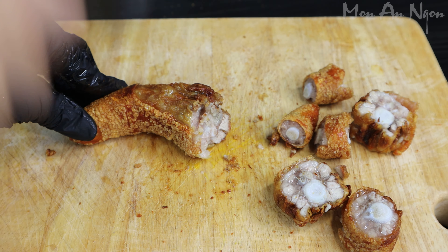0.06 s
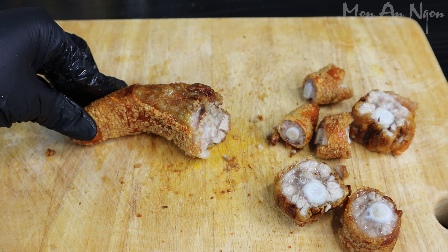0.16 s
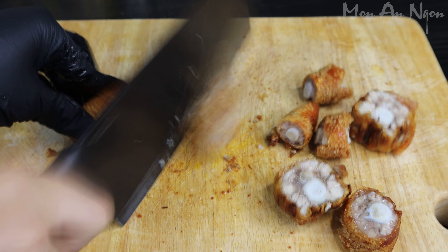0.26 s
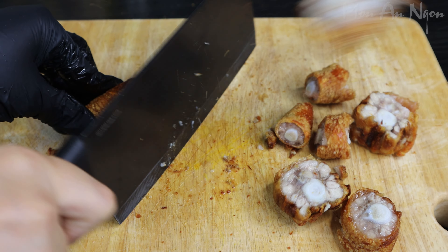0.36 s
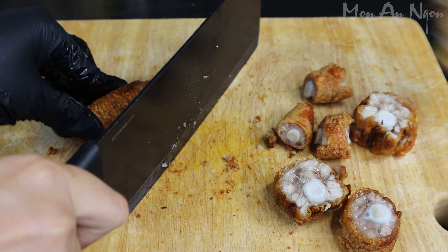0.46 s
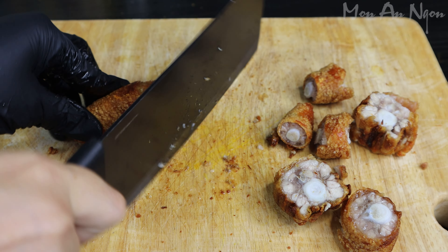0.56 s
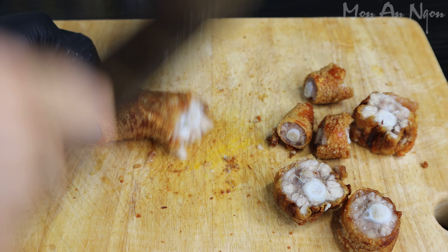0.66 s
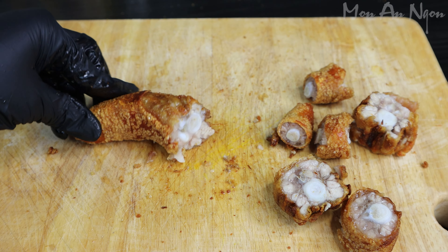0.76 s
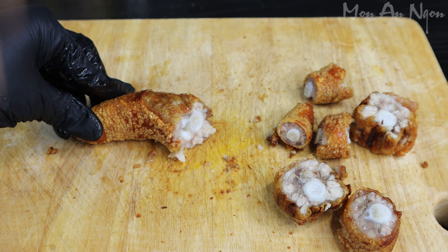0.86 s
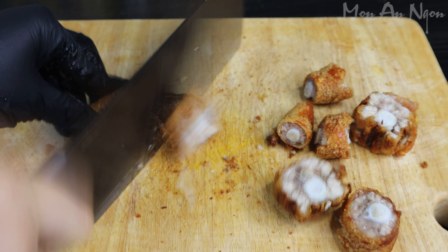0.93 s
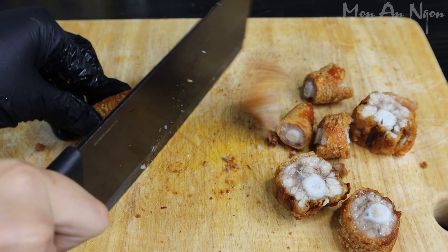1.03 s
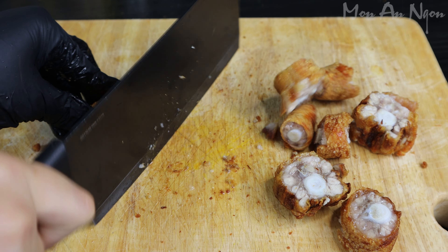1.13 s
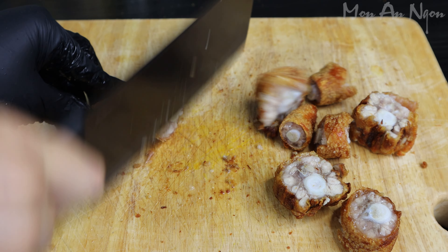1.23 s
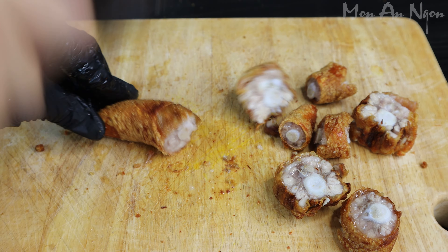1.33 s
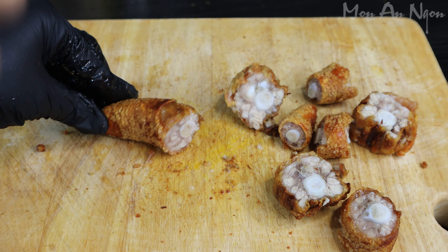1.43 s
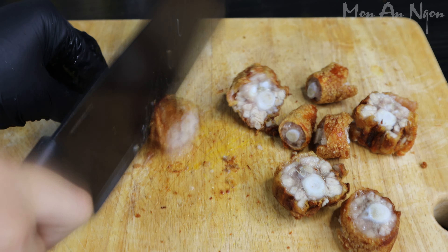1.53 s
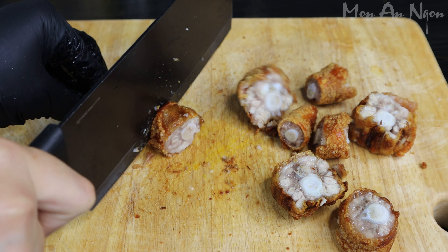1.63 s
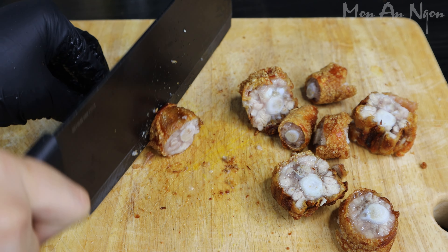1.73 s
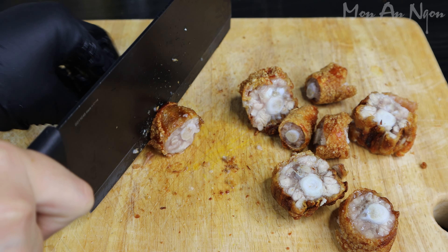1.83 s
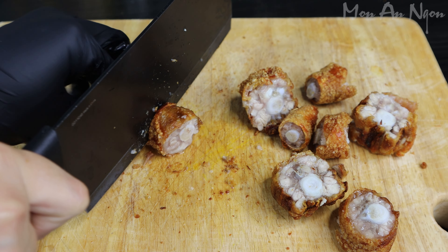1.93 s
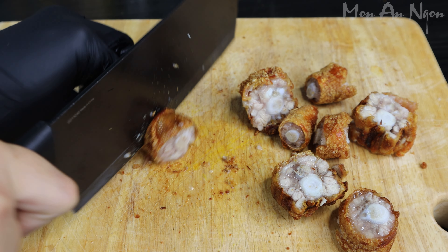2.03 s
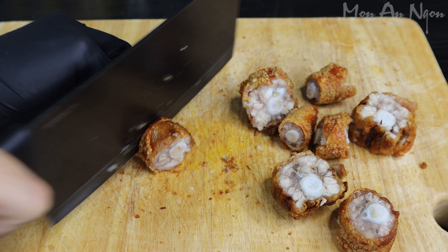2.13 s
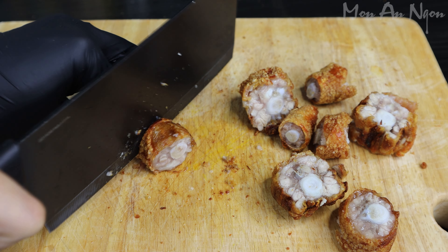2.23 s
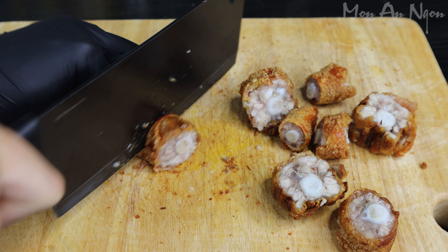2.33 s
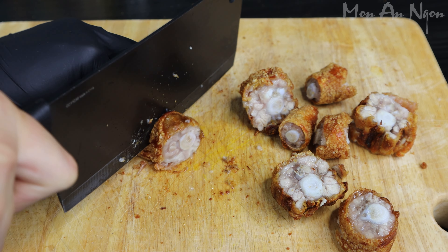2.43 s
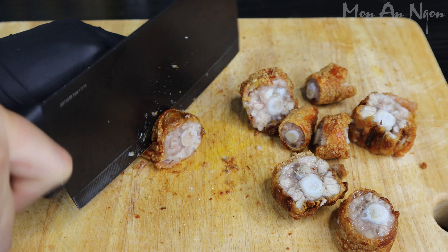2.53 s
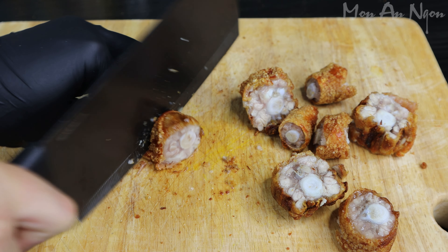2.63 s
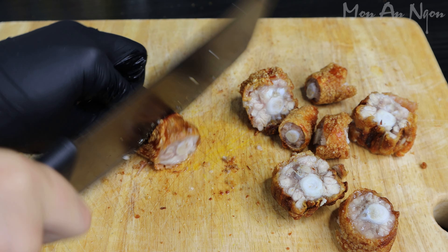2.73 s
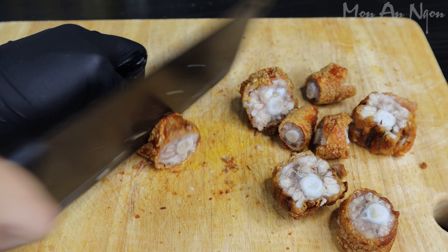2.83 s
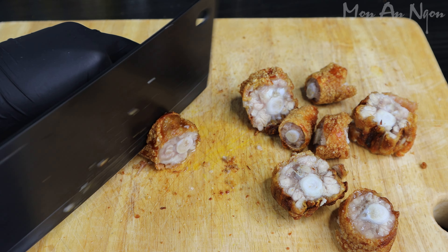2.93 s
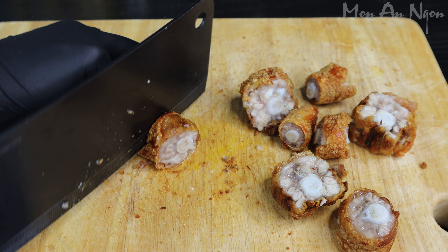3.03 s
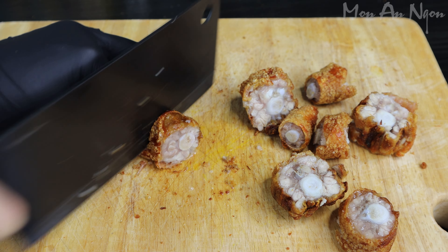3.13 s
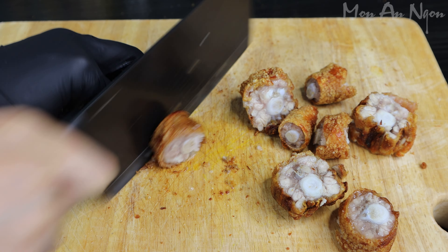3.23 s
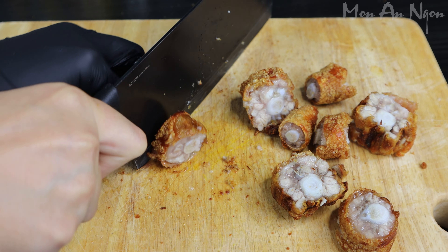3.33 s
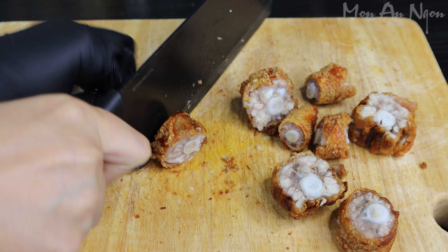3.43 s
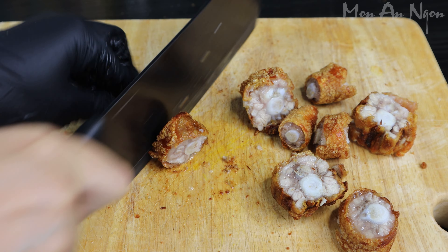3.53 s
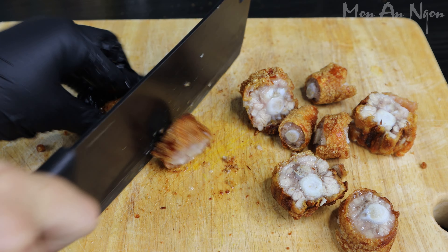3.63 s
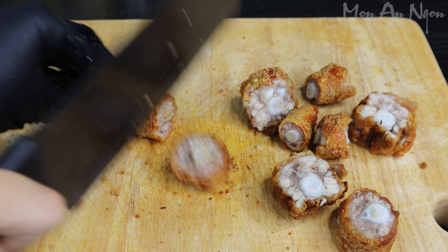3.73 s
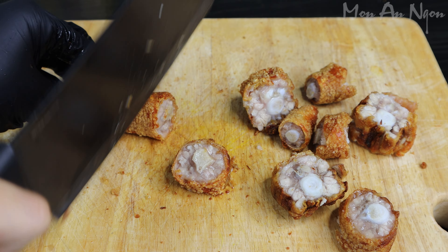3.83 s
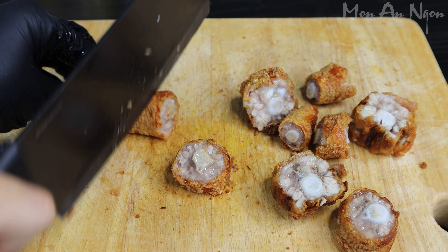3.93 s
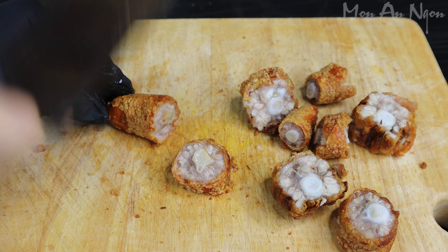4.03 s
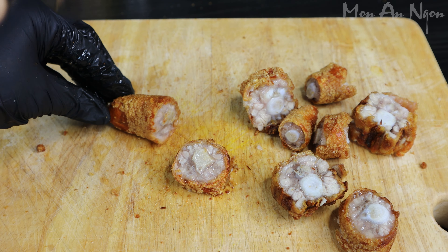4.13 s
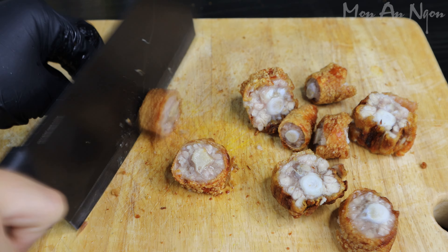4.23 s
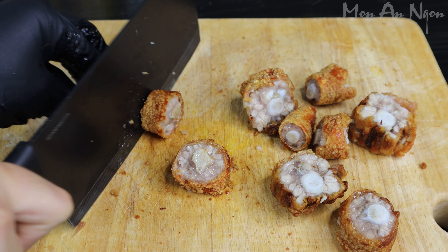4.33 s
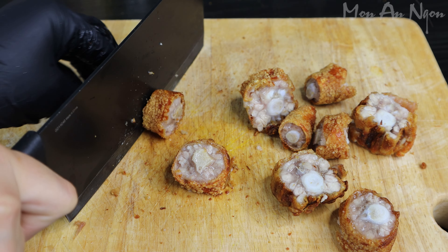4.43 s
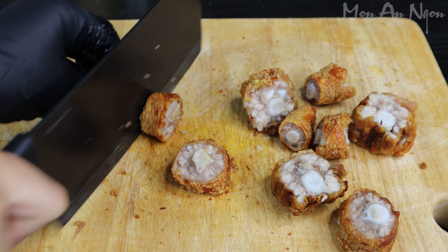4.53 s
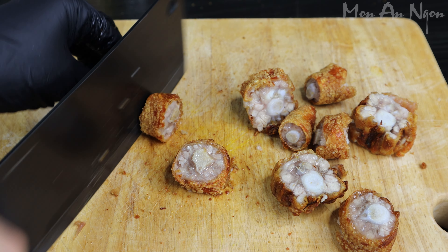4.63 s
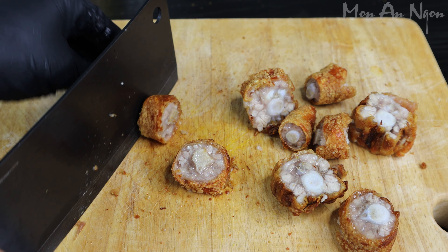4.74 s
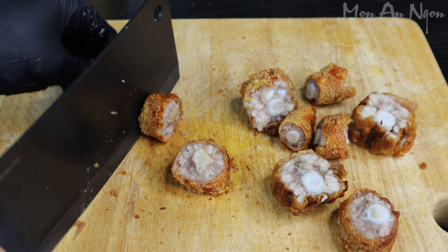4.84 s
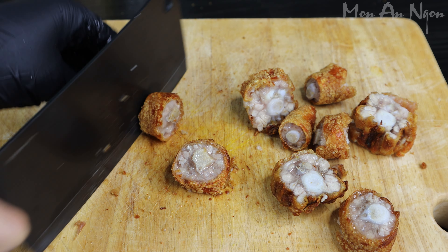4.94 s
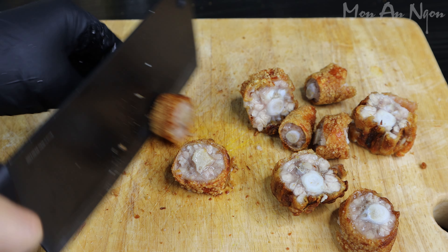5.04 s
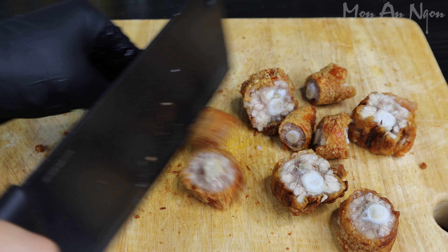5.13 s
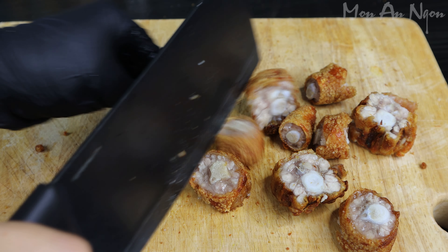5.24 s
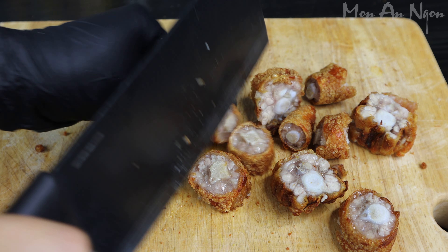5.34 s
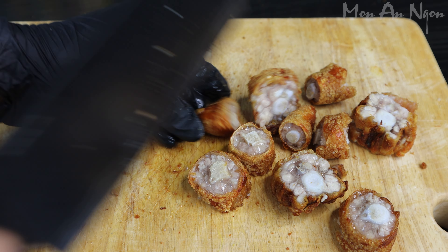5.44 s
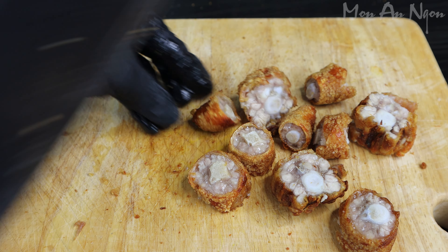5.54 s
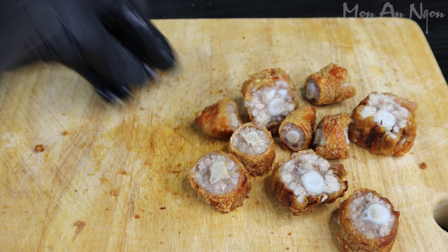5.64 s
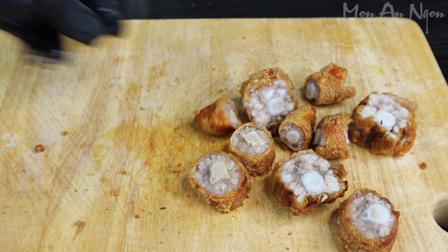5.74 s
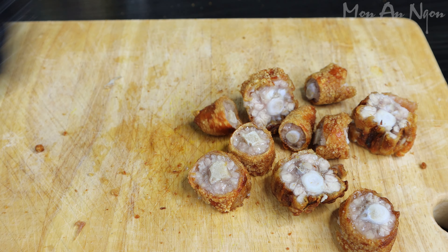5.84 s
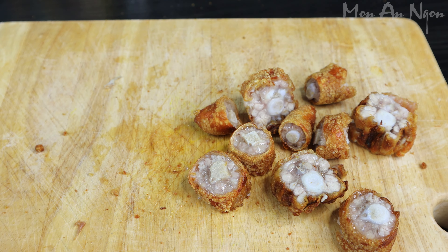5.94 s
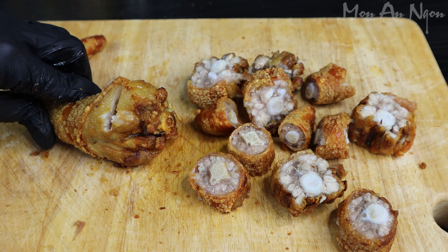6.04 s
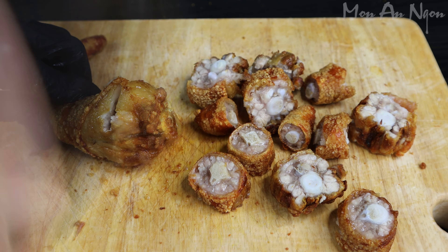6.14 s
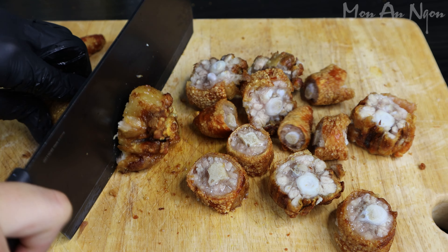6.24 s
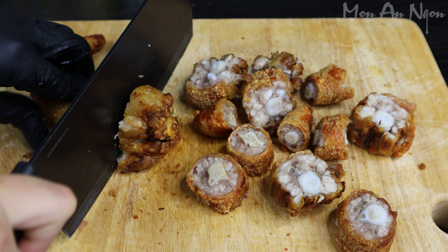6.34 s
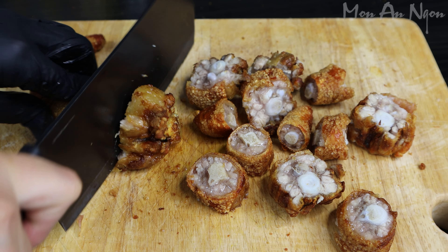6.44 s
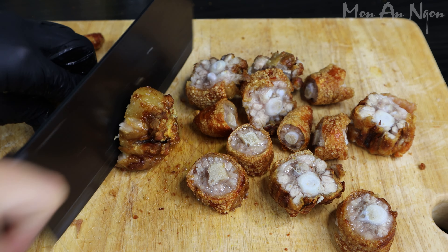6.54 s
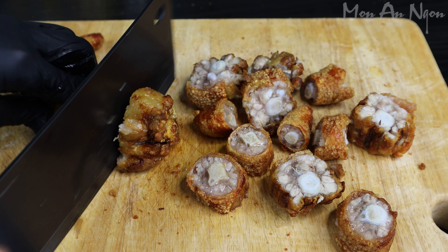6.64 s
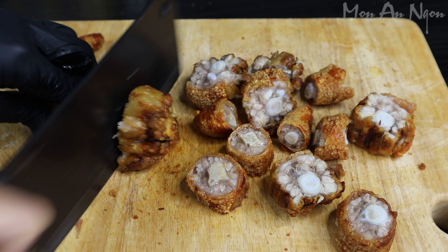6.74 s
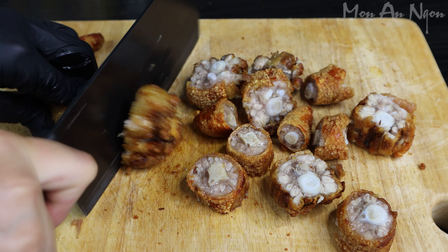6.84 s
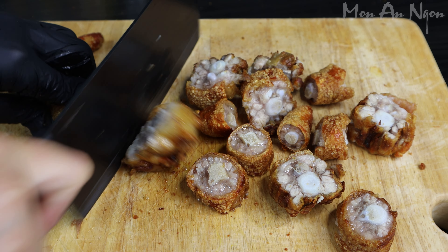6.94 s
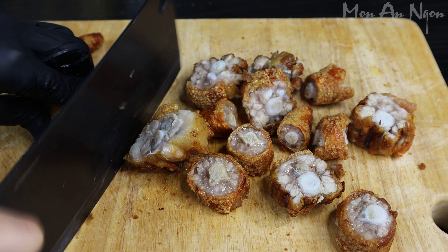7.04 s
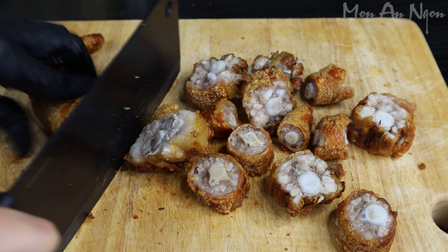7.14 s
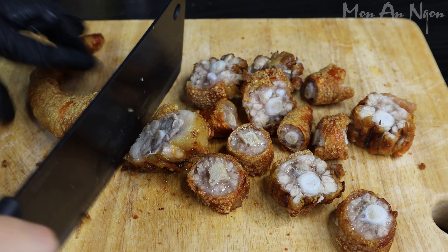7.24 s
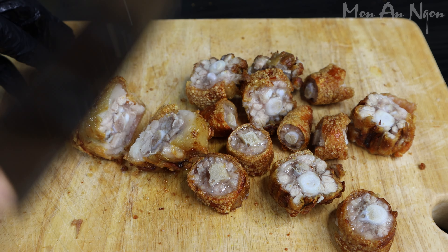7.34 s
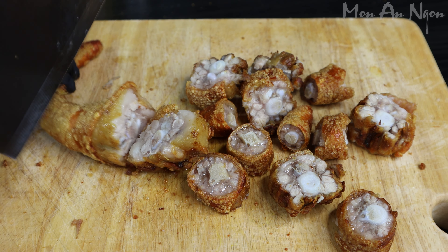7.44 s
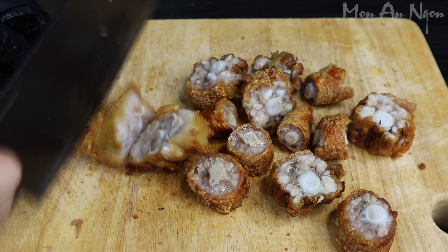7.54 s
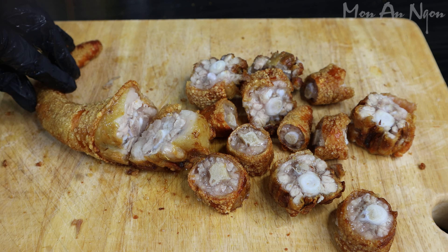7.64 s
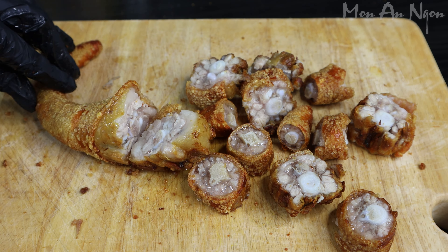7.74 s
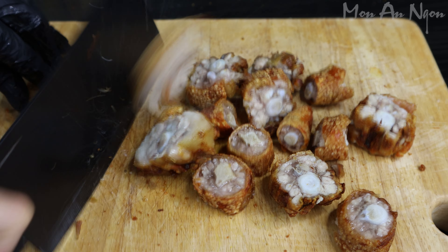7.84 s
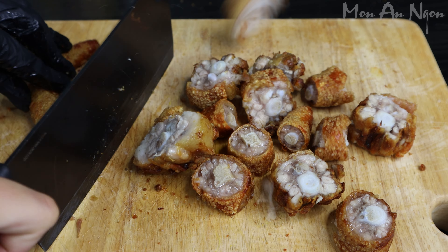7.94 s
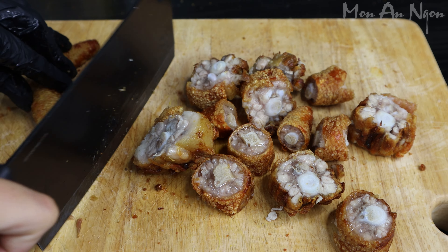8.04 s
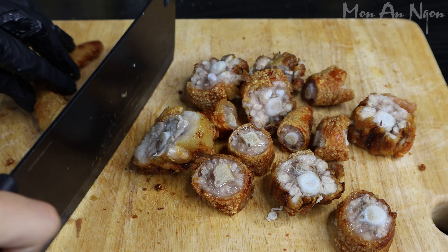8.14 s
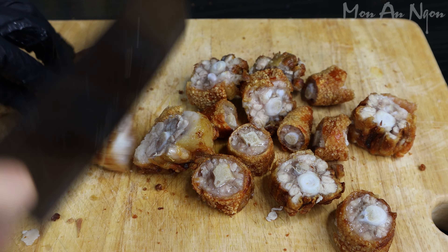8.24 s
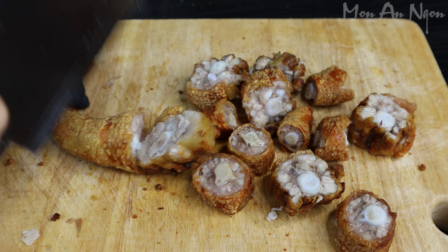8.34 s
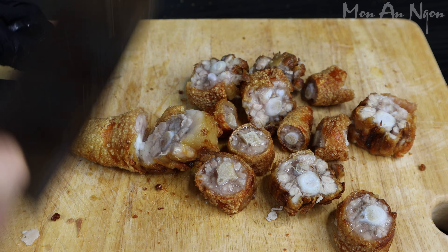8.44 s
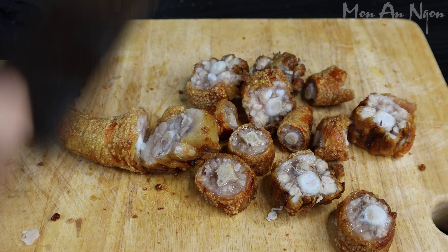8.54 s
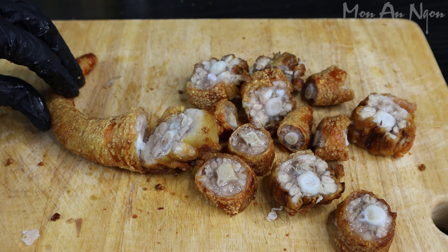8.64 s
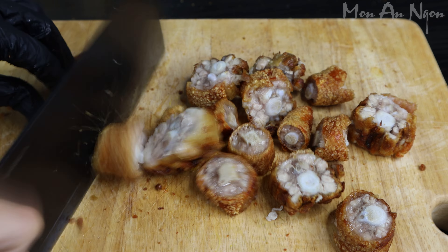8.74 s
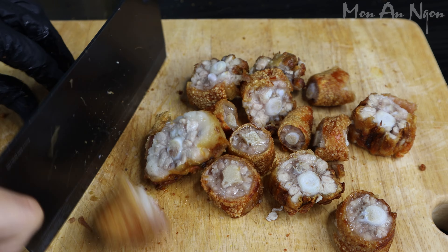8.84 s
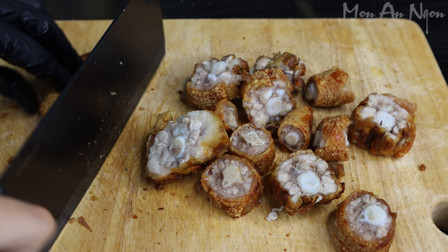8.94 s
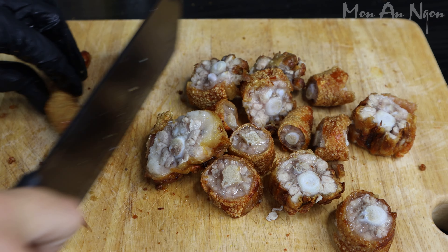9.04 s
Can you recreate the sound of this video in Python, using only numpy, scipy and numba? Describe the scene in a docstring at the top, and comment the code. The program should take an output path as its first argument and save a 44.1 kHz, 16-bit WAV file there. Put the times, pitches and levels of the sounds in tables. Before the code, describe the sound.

Close to a thick wooden board in a hard, echoing kitchen, over quiet low room tone, a heavy cleaver chops crisp fried meat. Loud blows land at 0.4, 1.0 and 1.6 seconds, the third somewhat weaker: each a very short crust crunch merging into a hollow midrange wooden knock, then a rattling reverberant tail. From 2.1 to 3.6 the blade saws grittily, with dry snaps and crackles, and a firm knock at 3.3. Small hits come near 3.9, then a huge chop at 4.3. Faint scrapes and ticks follow around 5.2 to 5.7. Another heavy chop at 6.25 makes the table hum; rough scraping and rubbing swell at 6.8 to 7.1. A crack with bright steel ringing at 7.6 leads to a big chop at 7.9, a light tick at 8.6 and a last hard chop at 8.8, echoing away. Loud peaks clip and duck the level.

```python
"""A heavy cleaver chops crisp fried meat on a thick wooden board in a hard, echoing kitchen, over room tone.
Each blow crunches the crust (shaped noise), then knocks the board (noise through resonances); table, board
bumps and some blade hits ring on as decaying modes while the kitchen echoes (decaying filtered noise).
Between blows the blade saws (gritty filtered noise) and the crust cracks (millisecond noise bursts).
A lagging gain control ducks the level after loud blows; peaks that outrun it clip."""
import sys
import numpy as np
from scipy import signal
from scipy.fft import rfft, irfft, next_fast_len
from scipy.io import wavfile
from scipy.ndimage import uniform_filter1d
from numba import njit

SR = 44100
rng = np.random.default_rng(int(sys.argv[2]) if len(sys.argv) > 2 else 0)


def unload_audio(sound):
    """Save the sound as a 16-bit wav file, at the path given as the first command line argument."""
    columns = np.transpose(np.atleast_2d(sound))
    # keep every value between -1 and 1, then stretch to whole-number steps
    steps = np.round(np.clip(columns, -1, 1) * 32767)
    wavfile.write(sys.argv[1], SR, steps.astype(np.int16))


N = 400163

# strokes of the blade sawing and pieces sliding; the first row is an earlier blow dying away:
# [start/s, swell/s, fade/s, rasp level/dB, fizz level/dB, board rub level/dB]
STROKES = [(0, 0.007, .04, -44, -67, -42), (2.052, 0.12, 0.12, -39, -48.5, -78),
           (2.28, 0.21, 0.14, -49.5, -45.5, -62), (2.559, 0.012, 0.068, -46, -46, -36),
           (2.63, .03, 0.094, -45, -38.5, -45.5), (2.8, 0.095, 0.031, -38, -44, -52),
           (2.9, 0.028, .17, -40, -55, -46), (3.19, 0.12, 0.013, -33.5, -37, -36),
           (3.4, 0.11, 0.067, -50, -47.5, -47), (3.579, 0.076, .1, -41.5, -52, -38),
           (3.84, 0.018, 0.015, -59, -71, -48), (4.72, 0.027, 0.55, -50, -70, -44),
           (5.15, 0.16, 0.11, -47.5, -59, -55), (5.6, .15, 0.26, -67, -60.5, -55),
           (6.083, 0.0091, 0.38, -50.5, -54.5, -47.5), (6.55, .13, 0.15, -37.5, -41, -38.5),
           (6.791, 0.041, 0.034, -30.5, -33.5, -37), (6.851, 0.024, 0.036, -24, -28, -17.5),
           (6.901, 0.029, 0.039, -27.5, -32, -22), (6.95, 0.025, 0.11, -54, -52, -34),
           (7.04, 0.05, 0.097, -29, -44, -24), (7.19, 0.014, 0.18, -53, -48, -40),
           (7.418, 0.088, 0.12, -43.5, -54, -41.5), (8.22, 0.079, .12, -51, -49.5, -44)]


def amp(db):
    """Decibels to gain."""
    return 10 ** (np.asarray(db) / 20)


def unit(x):
    """Scale to rms 1."""
    return x / np.sqrt(np.mean(x ** 2) + 1e-20)


def along(points, hz):
    """Interpolate (f/Hz, value) points on a log-frequency axis."""
    f_hz, value = np.transpose(points)
    return np.interp(np.log(hz + 1), np.log(f_hz + 1), value)


def filtered(x, response):
    """Multiply the spectrum of x by a (complex) response of frequency."""
    size = next_fast_len(len(x) + 8192)
    spectrum = rfft(x, size) * response(np.fft.rfftfreq(size, 1 / SR))
    return irfft(spectrum, size)[:len(x)]


def coloured(count, points):
    """Noise of rms 1 with a spectrum given as (f/Hz, level/dB)."""
    return unit(filtered(rng.standard_normal(count), lambda hz: amp(along(points, hz))))


def resonant(x, modes):
    """Sum of causal (f/Hz, width/Hz, level/dB) resonances of alternating sign, driven by x."""
    def response(f):
        total = 0
        for k, (centre, width, db) in enumerate(modes):
            band = 1j * f * width / (centre * centre - f * f + 1j * f * width)
            total = total + (-1) ** k * amp(db) * band
        return total
    return filtered(x, response)


def ringing(modes, t, attack_s, blur_hz):
    """Decaying modes, struck unevenly; the gripping hand and loose contacts blur each line."""
    out = 0
    for hz, db, t60_s in modes:
        drift = np.cumsum(rng.standard_normal(len(t))) * np.sqrt(2 * np.pi * blur_hz / SR)
        phase = 2 * np.pi * hz * t + uniform_filter1d(drift, size=64)
        level_db = db + rng.normal(0, 0.73) - 60 * t / t60_s
        out = out + amp(level_db) * np.sin(phase)
    return out * (1 - np.exp(-t / attack_s))


def room_tone():
    """Steady background: stationary coloured noise."""
    # room tone spectrum: [f/Hz, level/dB]
    air = [(18, -40), (45, -13), (62, 5), (90, -6), (120, 7.5), (170, -0.5), (273, -1.5), (415, -2),
           (721, -7.5), (801, -4), (1010, -8.5), (1590, -13), (2900, -15.5), (9220, -28.5), (11400, -28.5),
           (14800, -31.5), (16000, -43.5)]
    level_db = -46.5
    return amp(level_db) * coloured(N, air)


def room_tail():
    """The kitchen's impulse response: noise in which each frequency dies at its own speed."""
    # kitchen reverberation: [f/Hz, t60/s]
    kitchen = [(100, 0.9), (400, 1.08), (900, 1.104), (1600, 1.116), (2600, 1.12), (3100, 1), (5000, 0.94),
               (9000, 0.78), (15000, 0.43)]
    hz, t, z = signal.stft(rng.standard_normal(6 * SR // 5), SR, nperseg=256)
    decay = amp(-60 * t / along(kitchen, hz)[:, None])
    tail = signal.istft(z * decay, SR, nperseg=256)[1]
    t = np.arange(len(tail)) / SR
    near = 1 + 1.15 * np.exp(-t / 0.077)  # counter and nearest walls answer first and strongest
    onset = np.clip(t / 0.0049, 0, 1)
    scatter = 0.035 * rng.standard_normal(SR // 50) * np.exp(-t[:SR // 50] / 0.005)
    scatter[0] = 1  # weak random reflections colour each tail slightly
    return signal.fftconvolve(tail * near * onset, scatter)[:len(tail)]


def echoes(x):
    """A running sound through the kitchen: convolution with a tail of unit energy."""
    tail = room_tail()
    return signal.fftconvolve(x, tail / np.linalg.norm(tail))


def wood(x, pitch_hz):
    """Board modes, pitched by the spot; meat under the edge keeps the treble out."""
    # board modes: [f/pitch ratio, width/pitch ratio, level/dB]
    board = [(0.549, 0.047, 10), (0.951, 0.45, 13), (1.09, 0.27, -2), (1.301, 0.067, -31)]
    modes = [(pitch_hz * ratio, pitch_hz * width, db) for ratio, width, db in board]
    return resonant(resonant(x, modes), [(pitch_hz, 0.7 * pitch_hz, 0)])


def stroke(t, start_s, swell_s, fade_s):
    """Pressure of one stroke: swells, then fades."""
    curve = 0.73  # under 1 blunt, over 1 peaked
    corners = [start_s, start_s + swell_s, start_s + swell_s + fade_s]
    return np.interp(t, corners, [0, 1, 0]) ** curve


def gritty(rate_per_s, spread_db):
    """Uneven envelope of rms 1: tiny slips of random size, each decaying."""
    slips = (rng.random(N) < rate_per_s / SR) * amp(spread_db * rng.standard_normal(N))
    decay = np.exp(-np.arange(400) / SR / 0.00071)
    return unit(signal.fftconvolve(slips, decay)[:N])


def sawing():
    """Gritty friction: a rasp in the crust, a bright fizz of crumbs, a dull rub through the board."""
    # crust resonances: [f/Hz, width/Hz, level/dB]
    rasp = [(1610, 580, 5), (2410, 420, 12.5), (2790, 500, 14.5), (3550, 1450, 10.5), (4920, 560, -22),
            (7200, 430, -10)]
    # crumb friction spectrum: [f/Hz, level/dB]
    fizz = [(4000, -8), (7000, 5.5), (10000, -1), (13000, -3), (16000, -8.5)]
    t, grit = np.arange(N) / SR, gritty(400, spread_db=3)
    layers = [unit(resonant(rng.standard_normal(N) * (3.1 + grit), rasp)),
              unit(coloured(N, fizz) * (0.84 + grit)),
              unit(wood(rng.standard_normal(N) * (1.5 + grit), pitch_hz=835))]
    out = np.zeros(N)
    for start_s, swell_s, fade_s, *levels_db in STROKES:
        push = stroke(t, start_s, swell_s, fade_s)
        out += push * sum(amp(db) * layer for db, layer in zip(levels_db, layers))
    return out


def small_cracks():
    """Random crackle during strokes, as (t/s, peak/dB, f/Hz); stronger strokes crack louder."""
    tries_per_s, offset_db, spread_db = 60, 4, 2.5  # offset over the stroke's rasp and fizz
    when, size, pitch = rng.random((round(tries_per_s * N / SR), 3)).T
    when_s = when * N / SR
    force = sum(stroke(when_s, start_s, swell_s, fade_s) * (amp(rasp_db) + amp(fizz_db))
                for start_s, swell_s, fade_s, rasp_db, fizz_db, _ in STROKES)
    peak_db = 20 * np.log10(force + 1e-9) + offset_db - spread_db * np.log(1 - size)
    centre_hz = 2500 * 5.5 ** pitch
    return [row for row in zip(when_s, peak_db, centre_hz) if row[1] > -70]


def cracks():
    """Crust cracking: each a burst of a millisecond or two around its own pitch."""
    # single cracks of the crust: [t/s, peak level/dB, centre f/Hz]
    single = [(0.646, -27.5, 9000), (.728, -24.5, 9800), (1.327, -22, 3360), (2.0584, -33, 3365),
              (2.1131, -62, 3260), (2.165, -26, 4030), (2.2208, -24.5, 3610), (2.2957, -31, 3300),
              (2.3713, -32, 3860), (2.4086, -31, 3240), (2.432, -20, 11920), (2.441, -21.5, 3230),
              (2.4724, -21.5, 4650), (2.5181, -35, 3470), (2.539, -32, 3380), (2.654, -15.5, 3680),
              (2.67, -23, 4140), (2.689, -18.5, 6500), (2.814, -21.5, 3800), (2.842, -22, 8920),
              (2.8559, -30, 4260), (2.895, -15.5, 3160), (3.205, -27, 3380), (3.4248, -24, 5700),
              (3.5, -14.5, 3370), (3.652, -23, 3700), (3.855, -30, 3180), (5.2021, -36.5, 5500),
              (5.259, -30, 3460), (5.325, -35, 5190), (5.4893, -34, 1860), (5.5264, -30.5, 3400),
              (5.7445, -35, 2000), (6.096, -34, 3580), (6.269, 0, 3500), (6.6034, -26, 3273),
              (6.798, -19.5, 7980), (6.8164, -19, 4240), (6.8608, -24, 3630), (7.1003, -38, 3350),
              (7.208, -37, 3740), (7.2943, -31, 9940), (7.443, -31, 3890), (7.52, -36, 3490),
              (7.5444, -32, 3850), (7.653, -11.5, 6060), (8.2416, -29, 3310), (8.3205, -30, 3830),
              (8.3544, -37, 3470), (8.3874, -39, 3350), (8.471, -35, 4070)]
    out, t = np.zeros(N + SR), np.arange(SR // 40) / SR
    for s, peak_db, hz in single + small_cracks():
        burst = rng.standard_normal(len(t)) * amp(-60 * t / 0.015)
        b, a = signal.iirpeak(min(hz, 15000), 1.6, SR)
        pitched = signal.lfilter(b, a, signal.lfilter(b, a, burst))
        snap = unit(pitched) + 0.47 * unit(burst)
        out[round(s * SR):][:len(t)] += amp(peak_db) * snap / np.abs(snap).max()
    return out[:N]


def blade():
    """Ringing steel: the touched spot favours modes near one pitch; dense modes merge into a shimmer."""
    # the blade set ringing: [t/s, level/dB, favoured f/Hz, spread/octaves]
    pings = [(.730, -42, 7700, 0.35), (1.032, -48, 7900, 1), (1.677, -42, 8040, 1.2),
             (3.978, -38, 12500, 0.37), (6.252, -55, 7940, 1), (7.632, -22, 6030, 1.2),
             (8.573, -35, 3630, 1.8), (8.836, -53, 8000, 1.2)]
    # blade modes: [f/Hz, level/dB, t60/s]
    modes = [(2230, -7, 0.18), (2900, -1, 0.41), (3180, 1, 0.25), (4200, -13, 0.7), (4900, -16, 0.4),
             (6300, -13, 0.52), (7750, -7, 0.32), (8904, -20, 0.92), (9800, 0, 0.17), (10800, -4, 0.28),
             (11100, -6, 0.36), (12340, -19.5, 0.32), (13800, -11.5, 0.28), (14400, -11, 0.17)]
    out, t = np.zeros(N + SR), np.arange(SR) / SR
    for s, ring_db, ring_hz, spread in pings:
        def favour_db(hz):
            return -10 * (np.log2(hz / ring_hz) / spread) ** 2
        steel = [(hz, db + favour_db(hz), t60_s) for hz, db, t60_s in modes]
        shimmer = filtered(rng.standard_normal(SR), lambda hz: amp(favour_db(hz + 1)))
        shimmer = amp(-8 - 60 * t / 0.24) * unit(shimmer)
        ring = ringing(steel, t, attack_s=0.001, blur_hz=40)
        out[round(s * SR):][:SR] += amp(ring_db) * (ring + shimmer)
    return out[:N]


def crunch(t, length_s):
    """Crust shattering: coloured noise, held for length_s, then cut off fast."""
    # crunch spectrum: [f/Hz, level/dB]
    crust = [(120, -72.5), (400, -9.5), (1000, -15), (2000, -10.5), (3500, -9.5), (5500, -16.5),
             (8000, -17), (11000, -18.5), (16000, -31.5)]
    shatter = np.clip(t / 0.00065, 0, 1) * amp(-np.maximum(t - length_s, 0) * 60 / 0.013)
    splinters = amp(5 * uniform_filter1d(rng.standard_normal(len(t)), size=24))  # uneven
    return shatter * splinters * coloured(len(t), crust)


def knock(t, lag_s, pitch_hz):
    """Edge meeting the board: a short noise push through the board modes, peak 1."""
    push = (t >= lag_s) * amp(-60 * np.maximum(t - lag_s, 0) / 0.014) * rng.standard_normal(len(t))
    hit = wood(push, pitch_hz)
    return hit / np.abs(hit).max()


def blow_echo(pitch_hz, levels_db, early):
    """Kitchen's answer to board, crust, thud and crumbs: one tail each, rms set over the early samples."""
    # crust echo spectrum: [f/Hz, level/dB]
    crust_echo = [(250, -43), (600, -15.5), (1300, 3), (1750, 4), (2000, 4), (2400, 3.5), (2900, 0),
                  (3600, -3.5), (4300, -8), (5500, -13.5), (8000, -27), (12000, -53.5), (16000, -65.5)]
    # counter and cupboards thudding: [f/Hz, level/dB]
    thud = [(40, -70), (70, -32), (110, 2), (280, 0.5), (450, 5.5), (700, -15.5), (1500, -43), (4000, -85)]
    # flying crumbs: [f/Hz, level/dB]
    crumbs = [(400, -57.5), (1200, -41.5), (2500, 4), (4000, 6.5), (6500, 5), (10000, -2), (14000, -2),
              (16000, -12)]
    voices = [wood(room_tail(), pitch_hz)]
    for points in (crust_echo, thud, crumbs):
        voices.append(filtered(room_tail(), lambda hz: amp(along(points, hz))))
    return sum(amp(db) * v / np.std(v[:early]) for db, v in zip(levels_db, voices))


def chops():
    """Crust shatters, then the edge meets the board; the table rings on and the kitchen answers."""
    # blows: [t/s, crunch level before a common boost/dB, crunch length/s, board knock peak/dB, knock f/Hz,
    # table ring level/dB, bump level/dB, early echo levels: board/dB, crust/dB, thud/dB]
    blows = [(0.033, -36, 0.012, -40, 935, -68, -35.5, -44, -44.5, -72),
             (0.358, -11.5, 0.013, 4, 958, -44, -31.5, -6, -7.5, -14),
             (1.032, -10.5, 0.016, 6.5, 900, -17, -20, -7.5, -9, -19.5),
             (1.629, -12.5, 0.007, -11, 837, -26.5, -22, -28.5, -31.5, -27),
             (1.677, -24.5, 0.002, -3, 770, -32, -34, -28, -49, -34.5),
             (2.218, -50, 0.0028, -30, 865, -68, -41, -74, -53, -55),
             (2.565, -41, 0.031, -24, 830, -45, -24, -60, -59, -44.5),
             (3.292, -23, 0.0083, 5.5, 857, -38.5, -24.5, -17.5, -35.5, -30.5),
             (3.892, -34, 0.0034, -14.5, 864, -47, -51, -30.5, -36.5, -63),
             (3.975, -31, 0.0096, -41, 860, -46.5, -37.5, -69, -64, -59),
             (4.326, -9.5, 0.016, 10, 894, -17, -22, -7, -10.5, -23.5),
             (5.495, -63, 0.0033, -37, 825, -45, -52, -71, -74, -68),
             (6.252, -9.5, 0.0164, 7.5, 819, -4, -59, -9, -16.5, -9),
             (6.84, -30, 0.0027, -41, 885, -30, -24.5, -45, -40, -36),
             (7.633, -21.5, 0.012, -36, 793, -32, -20, -38, -36, -34.5),
             (7.894, -10, 0.018, 10, 1020, -11.5, -34, -5.5, -15.5, -16),
             (8.571, -26.5, 0.01, -55, 960, -53, -30.5, -48, -47, -55),
             (8.836, -10, 0.015, 8, 923, -20.5, -44, -3.5, -7, -14)]
    # table modes: [f/Hz, level/dB, t60/s]
    table = [(116.8, -2, 0.98), (162.7, -17, 1), (236.7, -9, 0.68), (287.2, -5.5, 0.95), (337, -15, 0.85),
             (398.6, -6.5, 0.81), (452, -7.5, 0.51)]
    # the board rocking on the table: [f/Hz, level/dB, t60/s]
    bump = [(104.1, -2, 0.75), (120.8, 3, 0.5), (160, -7.5, 0.89)]
    crunch_boost_db = 4.5
    knock_share, knock_latest_s = 0.48, 0.0074  # edge meets the board part-way through the crunch
    crumbs_db, crumbs_grow = -23.5, 0.68  # crumb echo follows the crunch level more slowly
    out, t = np.zeros(N + 3 * SR), np.arange(SR) / SR
    short = t[:SR // 10]
    for s, crunch_db, length_s, knock_db, pitch_hz, table_db, bump_db, *echo_db in blows:
        lag_s = min(knock_share * length_s, knock_latest_s)
        hit = amp(crunch_db + crunch_boost_db) * crunch(short, length_s)
        hit = hit + amp(knock_db) * knock(short, lag_s, pitch_hz)
        levels_db = echo_db + [crumbs_db + crumbs_grow * crunch_db]
        wet = blow_echo(pitch_hz, levels_db, early=len(short))
        at = round(s * SR)
        out[at:at + len(short)] += hit
        out[at + round(lag_s * SR):][:len(wet)] += wet
        out[at:at + len(t)] += amp(table_db) * ringing(table, t, attack_s=0.0017, blur_hz=1.5)
        out[at:at + len(t)] += amp(bump_db) * ringing(bump, t, attack_s=0.0056, blur_hz=4.1)
    return out[:N]


def scene():
    """Room tone, cracks and sawing with their echoes, blade and blows."""
    near = cracks() + sawing()
    near_echo = amp(-10.0) * echoes(near)[:N]
    return (room_tone() + near + near_echo + blade() + chops())[None]


@njit
def ducking(over_db, attack, recovery):
    """Gain reduction in dB: closes fast on an excess, opens at a steady rate (both per sample)."""
    cut, out = 0.0, np.empty_like(over_db)
    for i in range(len(over_db)):
        if over_db[i] > cut:
            cut = cut + attack * (over_db[i] - cut)
        else:
            cut = max(cut - recovery, 0.0)
        out[i] = cut
    return out


def record(dry):
    """Gain control that lags the blow, bass roll-off, clipping, then the band limit."""
    threshold_db, attack_s, recovery_db_per_s = -15, 0.008, 85
    bass_hz, top_hz = 45, 16100
    power = signal.lfilter([0.004], [1, -0.996], dry[0] ** 2)
    level_db = 10 * np.log10(np.abs(power) + 1e-12)
    cut_db = ducking(level_db - threshold_db, 1 / (attack_s * SR), recovery_db_per_s / SR)
    x = dry[0] * amp(-cut_db)
    x = filtered(x, lambda hz: (1j * hz / (1j * hz + bass_hz)) ** 2)
    x = x / (1 + np.abs(x) ** 12) ** (1 / 12)  # clips with a slightly rounded knee
    x = filtered(x, lambda hz: 1 / (1 + (hz / top_hz) ** 160) + 0.01)  # a little treble leaks past the limit
    return np.clip(x, -1, 1)[None]


dry = scene()
out = record(dry)
unload_audio(out)
```